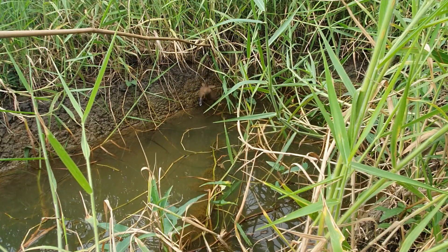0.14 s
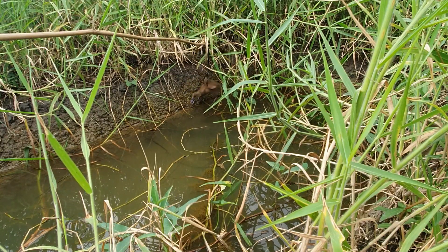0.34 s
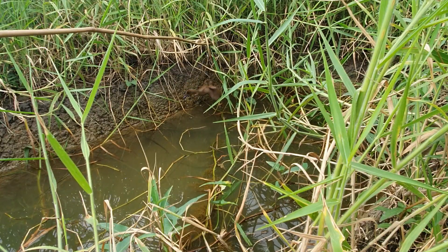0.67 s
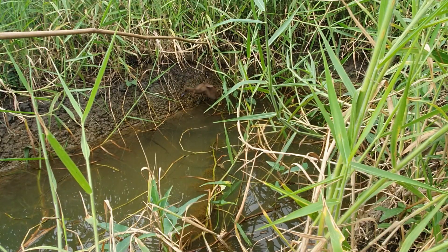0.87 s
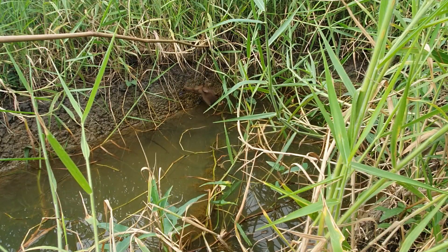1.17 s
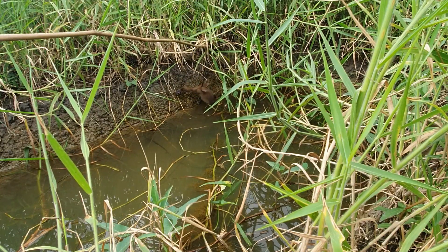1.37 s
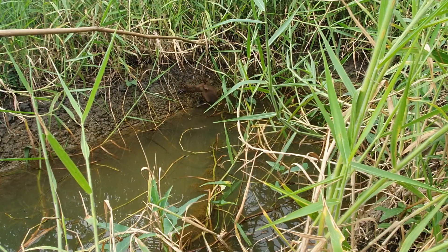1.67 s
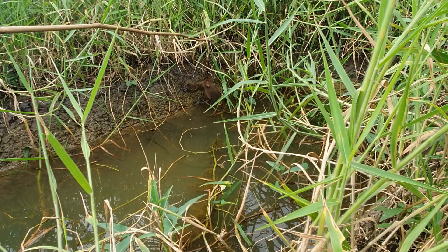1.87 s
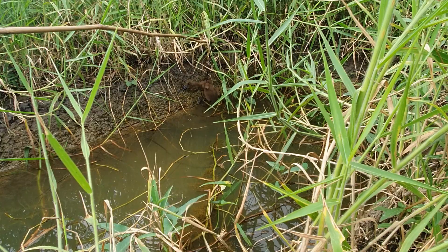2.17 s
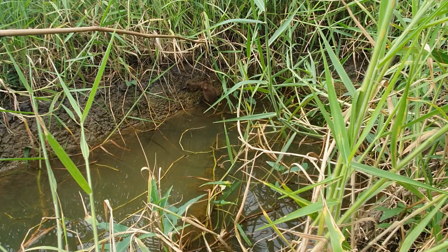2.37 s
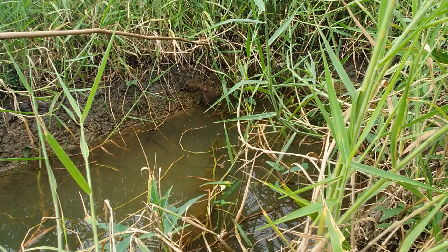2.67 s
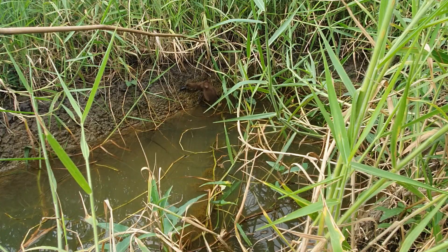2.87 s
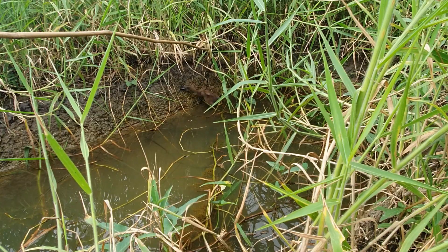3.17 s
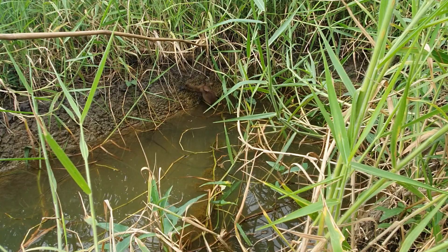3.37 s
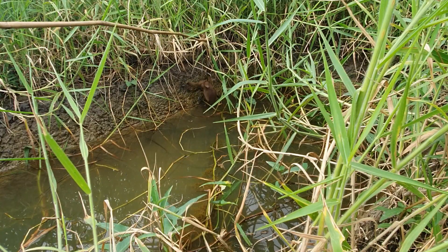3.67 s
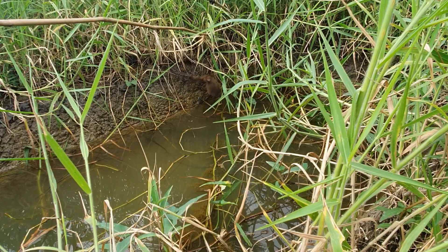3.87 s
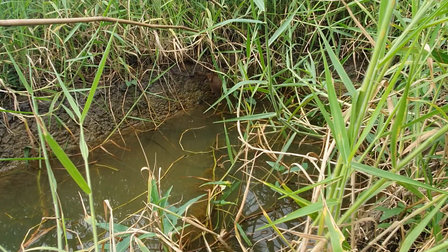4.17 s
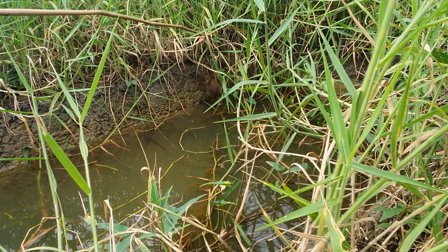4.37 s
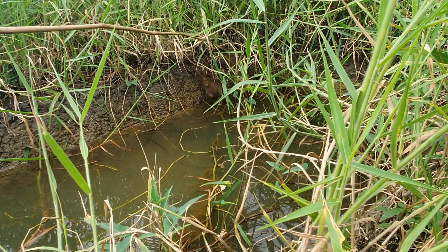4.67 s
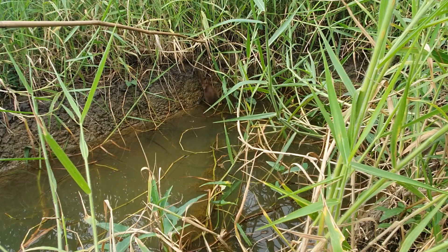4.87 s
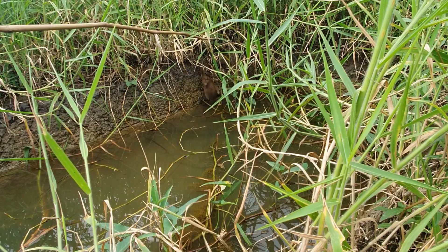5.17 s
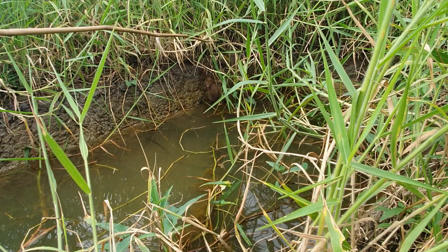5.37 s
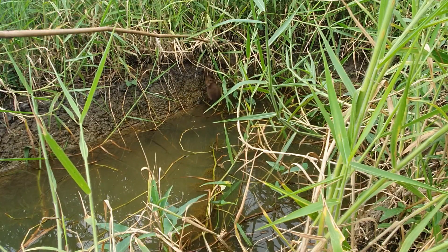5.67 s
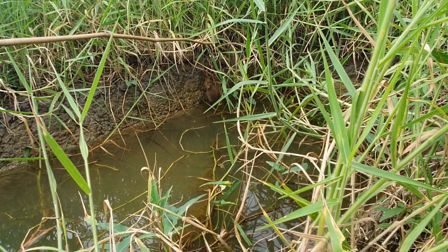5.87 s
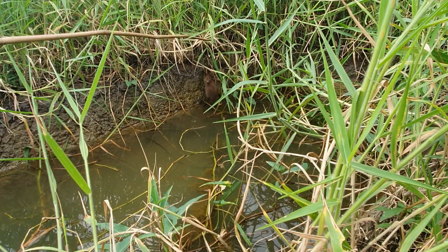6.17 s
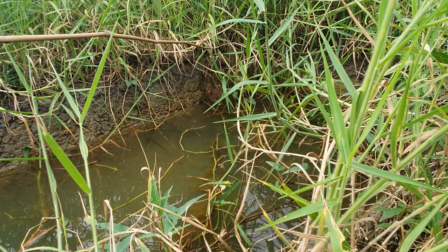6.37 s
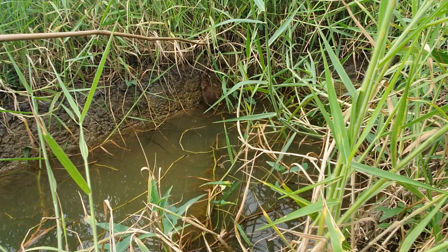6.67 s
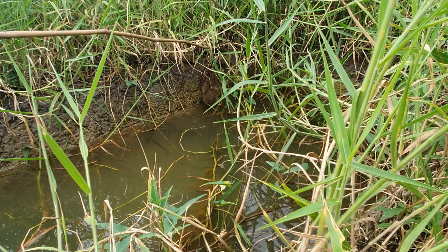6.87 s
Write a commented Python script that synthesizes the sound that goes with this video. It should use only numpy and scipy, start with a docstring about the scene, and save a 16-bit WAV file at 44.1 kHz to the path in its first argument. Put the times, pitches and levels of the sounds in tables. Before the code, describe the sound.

A duckling peeps in short, high calls, urgent, then softer, then stronger again, over faint insects and a distant low rumble.

```python
"""Duckling at the pond's edge

A few metres from a stereo microphone, left of centre, a duckling peeps among the reeds: urgently,
then softly, then rallying. Both sides of its syrinx sound together: one holds a whistle, the other
arches over it, beats against it and in many calls locks on. Reeds tick, drops fall, insects buzz
in the grass and a small bird twitters near the end, over a distant low rumble."""
import sys
import numpy as np
from scipy import signal
from scipy.io import wavfile
from scipy.ndimage import uniform_filter1d

SR = 44100
rng = np.random.default_rng(int(sys.argv[2]) if len(sys.argv) > 2 else 0)


def dump(signal):
    """Clip the signal to [-1, 1] and save it as 16-bit WAV at the path in sys.argv[1]."""
    limited = np.clip(np.atleast_2d(signal).T, -1, 1)
    pcm = np.round(limited * 32767).astype(np.int16)
    wavfile.write(sys.argv[1], SR, pcm)


N = 310023
TIME = np.arange(N) / SR


def from_db(db):
    """Decibels to gain."""
    return 10 ** (np.asarray(db) / 20)


def rms_one(x):
    """Scale to unit power."""
    return x / np.sqrt(np.mean(x ** 2) + 1e-20)


def at_hz(points, hz):
    """Read a spectrum on a log-frequency axis."""
    freqs, values = np.array(points).T
    return np.interp(np.log(hz), np.log(freqs), values)


def band(x, low_hz, high_hz):
    """Butterworth band-pass."""
    sos = signal.butter(2, [low_hz, min(high_hz, .48 * SR)], "band", fs=SR, output="sos")
    return signal.sosfilt(sos, x)


def hiss(size, low_hz, high_hz):
    """A short stretch of noise in one band, of about unit power."""
    return rms_one(band(rng.standard_normal(SR // 4), low_hz, high_hz))[:size]


def panned(x, pan_db):
    """Place a sound at constant power; pan is the left level minus the right."""
    return x * rms_one(from_db([[pan_db / 2], [-pan_db / 2]]))


def add(out, start_s, sound):
    """Mix a sound in at a given time."""
    at = max(round(start_s * SR), 0)
    out[..., at:at + sound.shape[-1]] += sound[..., :N - at]


def tone(hz):
    """Complex oscillator that follows a pitch curve."""
    return np.exp(2j * np.pi * np.cumsum(hz) / SR)


def drift(rate_hz, size):
    """A random wander with a spread of about 1."""
    knots = rng.standard_normal(4096)
    return np.interp(np.arange(size) * rate_hz / SR, np.arange(len(knots)), knots)


def open_air():
    """Far rumble and a soft hiss, band by band, with a faint hum."""
    # spectrum of the air: (frequency [Hz], relative density [dB])
    spectrum = [(25, -32.5), (40, -5), (62, -0.5), (100, -5.5), (160, -17), (280, -21), (450, -32.5),
                (750, -23), (1300, -32), (2500, -36), (5000, -40.5), (7800, -50.5), (15500, -49)]
    # likeness of the two channels: (frequency [Hz], correlation [-1 to 1])
    likeness = [(60, 0.96), (130, 1), (250, .4), (500, -0.15), (1000, -0.95), (2000, .05), (5000, 0.0052),
                (15000, -0.49)]
    air, edges_hz = 0, 22 * 2 ** np.arange(0, 10, .5)
    white = rng.standard_normal((2, 2, N))
    for k, (low, high) in enumerate(zip(edges_hz, edges_hz[1:])):
        mid, side = band(white[k % 2], low, high)
        hz = np.sqrt(low * high)
        alike = np.clip(at_hz(likeness, hz), -.99, .99)
        gain = from_db(at_hz(spectrum, hz) + .21 * drift(7.4, N))
        air = air + gain * (np.sqrt(1 + alike) * mid + np.sqrt(1 - alike) * side * [[1], [-1]])
    hum = from_db(-76.5) * tone(525 + 3 * drift(9.7, N)).real
    return rms_one(air) * from_db(-47.5) + hum


def insects():
    """Off to the left one insect rasps in swelling bouts; others keep up a steady higher buzz."""
    # bouts, each lasting until the next: (start [s], chirp rate [Hz], relative full level [dB])
    bouts = [(-1.235, 7.75, -60.5), (1.44, 8.3, -72.5), (3.26, 7.46, -63.5), (5.125, 7.8, -61)]
    bouts = np.array(bouts)
    swell_db, swell_s = 13.5, .55
    start, chirp_hz, full_db = bouts[np.searchsorted(bouts[1:, 0], TIME)].T
    since = TIME - start
    level_db = full_db - 4 - swell_db * np.exp(-since / swell_s)
    chirps = np.clip(.55 + .8 * np.cos(2 * np.pi * chirp_hz * since), .16, 1)
    wing_strokes = 1 + .5 * np.sin(2 * np.pi * 125 * TIME)
    rasp = rms_one(band(band(rng.standard_normal((2, N)), 8720, 9400), 8600, 9500))
    buzz = rms_one(band(band(rng.standard_normal((2, N)), 10280, 10900), 9950, 11400))
    return panned(rasp * chirps * wing_strokes * from_db(level_db), 9.6) + panned(buzz * from_db(-75), 5)


def banks(x):
    """Mud bank and reeds scatter a short cluster of echoes, then a faint tail."""
    t, tail_t60_s = TIME[:SR // 2], .28
    white = rng.standard_normal((2, 2, len(t)))
    near = white[0] * np.interp(t, [.002, .005, .024, .034], [.055, .5, .2, .0012])
    far = white[1] * from_db(-60 * t / tail_t60_s) * (t > .025)
    echoes = (from_db(-13.5) * rms_one(near) + from_db(-32.5) * rms_one(far)) / np.sqrt(len(t))
    return panned(signal.fftconvolve(x[None], band(echoes, 500, 14000), axes=1)[:, :N], 1.4)


def small_bird():
    """Quick runs of thin falling notes."""
    # twitters: (time [s], notes [count], level [dB])
    twitters = [(6.539, 5, -60), (6.904, 5, -60)]
    out, progress = np.zeros(N), np.linspace(0, 1, int(.014 * SR))
    note = np.sin(np.pi * progress) * tone(8000 - 650 * progress).real
    for start, notes, level_db in twitters:
        for k in range(notes):
            add(out, start + k * .02, from_db(level_db) * note)
    return panned(out, 3)


def reed_ticks():
    """Dry stems crack in a low and a high band."""
    # cracks: (time [s], relative body level [dB], relative snap level [dB], pan [dB])
    ticks = [(1.216, -58, -53.5, 8.5), (1.681, -54.5, -56, 3), (2.434, -47, -52.5, 3),
             (3.047, -44, -56, 26), (3.055, -42.5, -52, 1.5), (3.857, -72.5, -60.5, 6),
             (4.686, -49.5, -56, 4.5), (4.997, -76.5, -51, 8), (5.058, -56.5, -61.5, 11.5),
             (6.247, -39, -66, 17), (6.386, -49, -82.5, 12.5), (6.703, -46, -47, 3)]
    out, t, t60_s = np.zeros((2, N)), TIME[:SR // 12], .036
    for start, body_db, snap_db, pan_db in ticks:
        white = rng.standard_normal((2, 2, len(t)))
        body = from_db(body_db - 3.5) * rms_one(band(white[0], 1100, 3200))
        snap = from_db(snap_db + 2) * rms_one(band(white[1], 4200, 6800) + .26 * white[1])
        add(out, start, panned((body + snap) * from_db(-60 * t / t60_s), pan_db))
    return out


def water_drops():
    """Drops on the pond ring as small bubbles."""
    # bubbles: (time [s], pitch [Hz], level [dB], time to fall 60 dB [s])
    drops = [(0.933, 1450, -38.5, 0.034), (3.034, 1400, -40.5, 0.012), (3.45, 1630, -40.5, 0.018),
             (6.25, 1600, -48.5, 0.013), (6.386, 1280, -44, 0.0084), (6.707, 643, -46, 0.043)]
    out, t = np.zeros(N), TIME[:SR // 12]
    for start, hz, level_db, t60_s in drops:
        add(out, start, from_db(level_db - 60 * t / t60_s) * np.sin(2 * np.pi * hz * t))
    return panned(out, 2.4)


def contact_notes():
    """Between peeps the duckling gives soft low notes that rise and fall in pitch as they swell."""
    # notes: (time [s], length [s], pitch near the crest [Hz], level [dB])
    notes = [(3.281, 0.071, 1813, -52.5), (3.435, 0.056, 1658, -58), (3.515, 0.061, 1900, -57)]
    out = np.zeros(N)
    for start, length, hz, level_db in notes:
        swell = np.sin(np.linspace(0, np.pi, int(length * SR)))
        pitch_hz = hz * (.86 + .15 * swell + .014 * drift(700, len(swell)))
        add(out, start, from_db(level_db) * swell ** 2 * tone(pitch_hz).real)
    return out


def membrane_snap(since):
    """As the note breaks, the membrane flicks upward with a small crack."""
    size = len(since)
    flick = tone(np.interp(since, [0, .009], [3500, 6100]))
    crack = from_db(-4) * hiss(size, 1800, 4300) + from_db(-15) * hiss(size, 6500, 15500)
    return (.64 * flick + crack) * np.exp(-((since - .004) / .005) ** 2)


def arch_pitch(t, lead, off, end, near_hz, top_hz):
    """The second side shoots up, sinks toward the held note, then arches again as pressure is let go."""
    rest_hz, crest = 1950, .72 * lead
    span_hz = top_hz - rest_hz
    rise = rest_hz + span_hz * np.sin(np.pi / 2 * t / crest)
    sink = near_hz + (top_hz - near_hz) * np.exp(-(np.maximum(t - crest, 0) / .014) ** 1.3)
    fall = np.interp((t - off) / (end - off), [0, .2, .38, .7, 1],
                     [near_hz[-1], top_hz, top_hz, rest_hz + .37 * span_hz, rest_hz])
    return np.select([t < crest, t < off], [rise, sink], uniform_filter1d(fall, size=120))


def rasping_glides(t, lead, off, end, second_hz, foot_db, arch_db):
    """Before and after the hold both sides glide apart, unsteady and rasping; the first stays lower."""
    size = len(t)
    sounding = np.interp(t, [0, .003, lead, lead + .0083, off - .002, off + .001, end - .003, end],
                         [0, 1, 1, 0, 0, 1, 1, 0])
    strain = np.clip((second_hz - 2800) / 1200, 0, 1)
    first_hz = second_hz - .6 * np.maximum(second_hz - 3000, 0)
    second = tone(second_hz * (1 + (.007 + .014 * strain) * drift(1100, size)))
    first = tone(first_hz * (1 + .04 * drift(1100, size)))
    flutter = from_db((2 + 3 * strain) * drift(500, size) - 1.5 - strain * np.where(t < lead, 6, 3))
    pressure = np.exp(-np.maximum(np.maximum(lead - t, t - off), 0) / .02)   # highest next to the hold
    rasp = from_db(-10) * hiss(size, 3000, 6200) + from_db(-19.5) * pressure * hiss(size, 6000, 15000)
    voice = second * flutter + strain * (.5 * first + rasp)
    return from_db(foot_db + arch_db * strain) * sounding * voice


def hoarseness(note_hz, held, urgency, first):
    """At low pressure the membrane doubles its period: partials near 1/2 and 3/2 of the pitch."""
    half = tone(note_hz * .55 * (1 + .13 * drift(1000, len(held))))
    level_db = np.interp(urgency, [0, .22], [-55, -68.5])
    return from_db(level_db) * np.interp(held, [.45, .75], [1, .12]) * half * (1 + .5 * first)


def peep(urgency, hold, attack, pitch_hz, glide_hz, full_db, dip_db, gap_hz, second_db, lock,
         fall_db, octave_db):
    """One call from both sides of the syrinx: its lead-in time, held whistle and surrounding glides."""
    def by_urgency(calm, urgent):
        return np.interp(urgency, [0, 1], [calm, urgent])

    lead = max(.031 - .00005 * max(glide_hz, 0), .01)   # a rising note takes over sooner
    off = lead + hold
    end = off + .027
    size = int(end * SR)
    t = np.arange(size) / SR
    early = np.maximum(lead - t, 0)
    held = np.clip((t - lead) / hold, 0, 1)
    apart = 1 / (1 + np.exp(np.clip((held - lock) / .06, -30, 30)))   # 0 once the sides lock

    # the first side scoops in from below, bends gently, kicks upward and breaks off
    scoop_hz_per_s, bow_hz = 14000, by_urgency(56.3, -21)   # calm notes bow upward, urgent ones sag
    swing = (held - .53) / .65
    note_hz = pitch_hz + glide_hz * swing + bow_hz * (.4 - (2 * swing) ** 2)
    kick_hz = 260 * np.exp(np.minimum(t - off, 0) / .0014)
    jitter = (.0015 + .005 * apart) * drift(600, size)
    first = tone((note_hz + kick_hz - scoop_hz_per_s * early) * (1 + jitter))
    attack_db = -18 * np.exp(-held * hold / attack)
    waver_db = by_urgency(2.5, .93) * drift(200, size)
    late_dip_db = -dip_db * np.exp(-((held - .72) / .15) ** 2)   # a brief dip in level late in the note
    level = from_db(full_db + attack_db + waver_db + late_dip_db)
    gate = from_db(-1300.5 * early - 4500 * np.maximum(t - off + .001, 0))

    near_hz = note_hz + gap_hz * (1.25 - .18 * held)
    second_hz = arch_pitch(t, lead, off, end, near_hz, top_hz=by_urgency(3204, 6155))
    second = tone(second_hz * (1 + (.007 + .025 * (1 - held) ** 4) * drift(900, size)))
    # while apart, the sides pull on each other once per beat and throw off a comb of sidebands
    beat = apart * second / first
    throat = 1 / np.hypot(1, (second_hz - note_hz) / 1100)   # favours what lies near the held note
    sidebands = from_db(second_db + 4) * throat * beat / (1 - .19 * beat)
    voice = first * (1 + sidebands - .18 * held * sidebands.conj())

    # the overtones are rougher than the note, in level and in pitch
    rough = from_db(2 * drift(320, size)) * (1 - .46 * apart) / (1 - .26 * throat * beat) ** 2
    rough = rough * tone(55 * drift(900, size))
    overtones = rough * from_db(octave_db) * (first ** 2 + from_db(-17) * first ** 3)
    overtones += rough ** 2 * from_db(-52 + 6 * apart) * first ** 4
    grit = apart * (from_db(-45) * hiss(size, 3400, 7500) + from_db(-47) * hiss(size, 7600, 15500))
    whistle = gate * (level * (voice + overtones + grit) + hoarseness(note_hz, held, urgency, first))

    foot_db = np.interp(t, [lead, off], [by_urgency(-37.5, -46), fall_db])
    glides = rasping_glides(t, lead, off, end, second_hz, foot_db, arch_db=by_urgency(-23, 2))
    snap = from_db(-35 + .55 * full_db) * membrane_snap(t - off)
    return lead, whistle, glides + snap


def duckling():
    """All calls: the sound that reaches the microphone directly, and the sound sent to the banks."""
    # peeps: (start of hold [s], urgency [0-1], hold [s], attack [s], pitch [Hz], glide [Hz],
    #   level [dB], late dip [dB], nominal gap between the sides [Hz], relative second side [dB],
    #   lock point [share of hold], foot of closing glide [dB], relative octave [dB], pan [dB])
    peeps = [(0.067, 0.88, 0.062, 0.0062, 3482, -62, -14.5, 4, 255, -25, 0.21, -32, -43, 6.5),
             (0.357, 1, 0.059, 0.01, 3635, -28, -13, 3.5, 286.6, -13, 0.52, -38, -41, 6),
             (0.625, 0.98, 0.083, .015, 3353, 17, -18, 1.5, 241.6, -11, 0.94, -38.5, -17, 8),
             (0.942, .85, 0.067, 0.012, 3544, 60, -14.5, -1, 249.5, -3.5, 0.098, -36, -38, 7.5),
             (1.256, 0.94, 0.067, 0.0075, 3473, 42, -13.5, 2, 248, -15.5, 0.39, -42.5, -42, 8.5),
             (1.566, 0.83, 0.057, 0.014, 3424, -34, -15, 1.5, 292, -23, 0.57, -44, -24.5, 4.5),
             (1.871, .88, 0.057, 0.0095, 3426, -78.5, -15, 0, 290, -22, .45, -50.5, -23.5, 8.5),
             (2.168, .87, 0.06, 0.0058, 3565, -1, -18, -0.5, 525, -16, 1.5, -43, -27, 7.5),
             (2.481, 0.88, 0.07, 0.012, 3503, 37.5, -19.5, 4, 290, -7.5, 1.4, -49.5, -22.5, 7.5),
             (2.875, .66, 0.06, 0.018, 3347, 78, -17, -2, 314, -14.5, 1.8, -51, -29.5, 8.5),
             (3.578, 0.35, 0.067, 0.02, 3201, 181, -18, 2, 469, -17, 1.5, -66, -24.5, 12),
             (4.015, 0.5, 0.063, .017, 3350, 124.5, -21.5, -2.5, 570, -19.5, 1.5, -58, -22.5, 9.5),
             (4.523, 0.05, 0.066, 0.0016, 3267, 170.5, -33.5, 5.5, 413, -11.5, 1.7, -47, -22.5, 6),
             (4.86, 0, 0.06, 0.032, 3430, 152.5, -31.5, 1, 328, -15.5, 1.6, -34, -21, 6),
             (5.191, 0.26, 0.059, 0.027, 3357, -19.5, -31, -7.5, 127.7, -10, 0.46, -68, -29.5, 3),
             (5.522, 0.37, 0.055, 0.0079, 3380, -72, -25.5, 8.5, 256, -26, 0.48, -56, -33.5, 6),
             (5.842, 0.56, 0.051, 0.012, 3476, -170, -15.5, 6, 344, -20, 0.72, -44.5, -33, 5.5),
             (6.166, 0.4, 0.067, 0.006, 3225, 140, -19, 5, 186, -17, 0.8, -56, -27, 3),
             (6.499, 0.28, 0.065, 0.014, 3119, 39.5, -12.5, -2.5, 292, -26, 0.47, -61, -33, 6.5),
             (6.811, 0.41, 0.065, 0.015, 3292, -36, -17.5, 17, 295, -21.5, 1, -50, -31, 9)]
    left_lead_rad = 1.38   # the left channel is ahead in phase
    phases = np.exp(.5j * left_lead_rad * np.array([[1], [-1]]))
    direct, sent = np.zeros((2, N)), np.zeros(N)
    for start, *shape, pan_db in peeps:
        lead, whistle, glides = peep(*shape)
        add(direct, start - lead, np.real(panned(whistle + glides, pan_db) * phases))
        # the glides spread widely, so more of them comes back from the reeds
        add(sent, start - lead, np.real(whistle + 2 * glides))
    soft = contact_notes()
    return direct + panned(soft, 3), sent + soft


def scene():
    """The duckling and the small sounds of the pond in the open air."""
    direct, sent = duckling()
    small = reed_ticks() + water_drops() + small_bird()
    return direct + small + banks(sent + small.mean(axis=0)) + insects() + open_air()


def record(dry):
    """The top is cut steeply."""
    cutoff_hz = 15750
    return signal.sosfilt(signal.ellip(12, .1, 80, cutoff_hz, fs=SR, output="sos"), dry)


dry = scene()
out = record(dry)
dump(out)
```